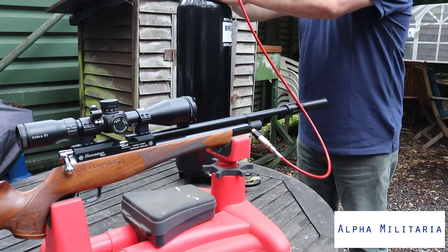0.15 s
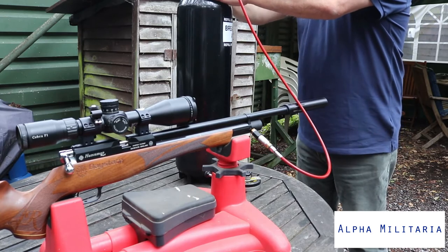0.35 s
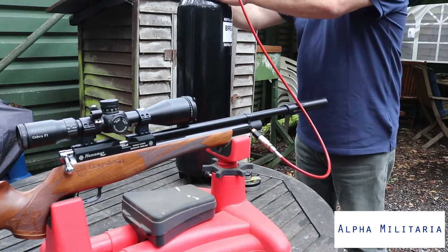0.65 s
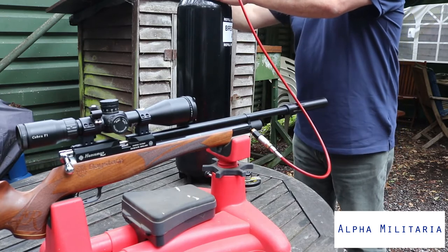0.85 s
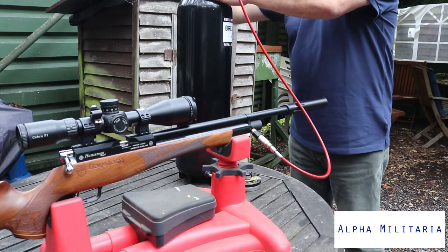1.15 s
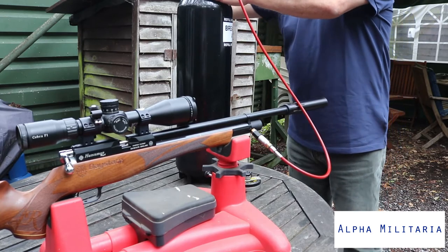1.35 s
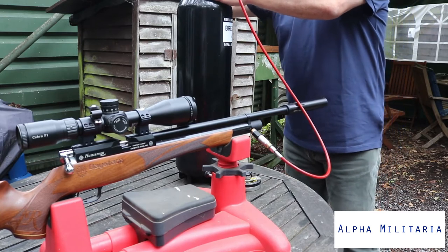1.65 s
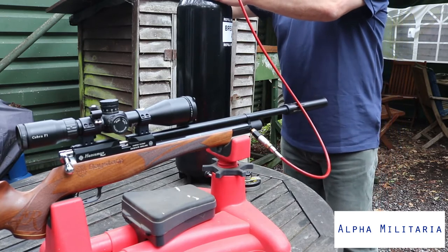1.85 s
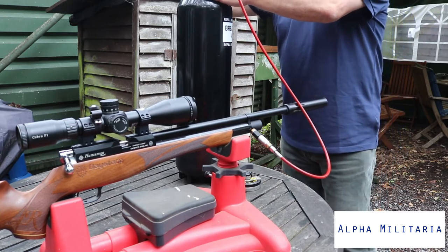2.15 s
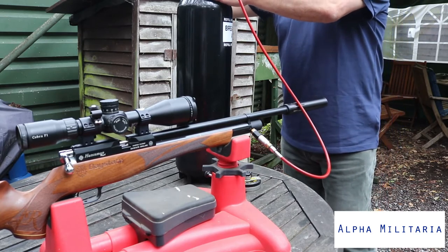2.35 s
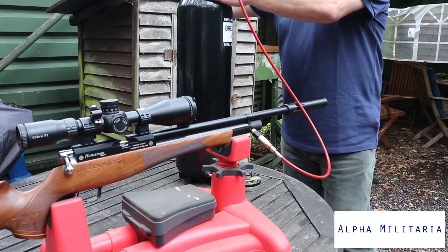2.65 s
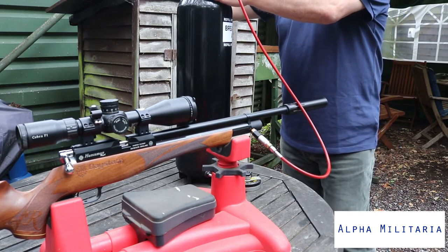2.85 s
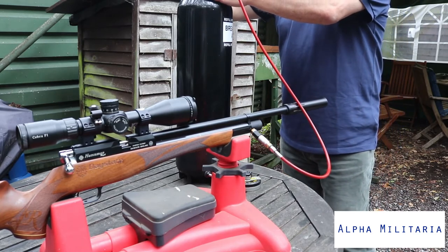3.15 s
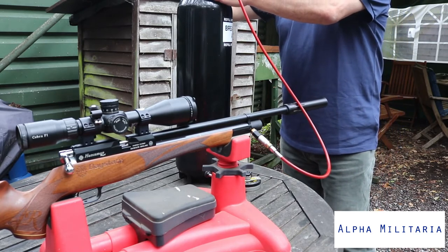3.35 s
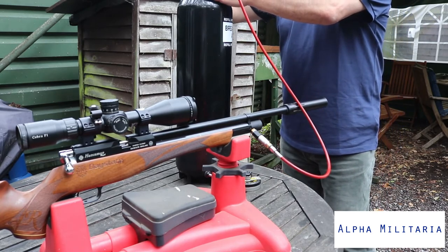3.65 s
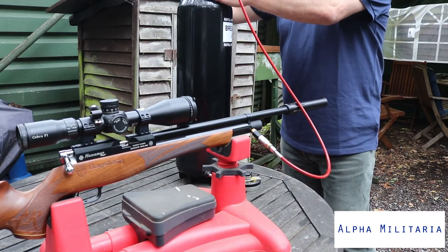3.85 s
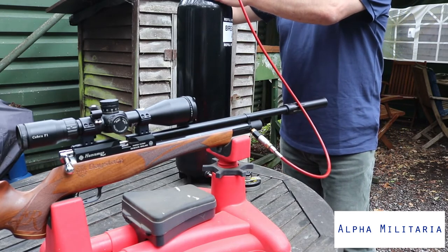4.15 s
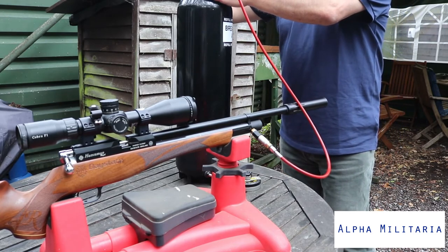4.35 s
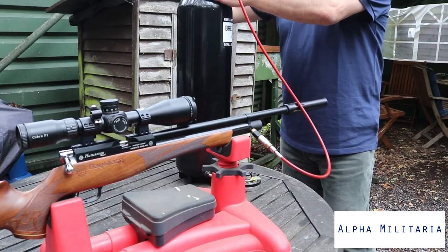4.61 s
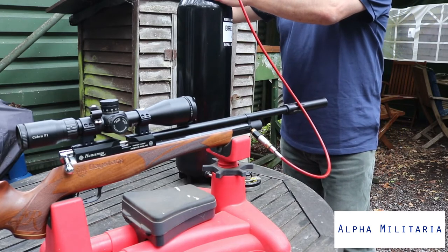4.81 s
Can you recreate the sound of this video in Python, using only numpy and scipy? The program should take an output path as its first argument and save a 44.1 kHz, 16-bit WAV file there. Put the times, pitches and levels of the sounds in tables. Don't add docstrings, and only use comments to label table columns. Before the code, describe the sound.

After a tiny leak whistle and squeak, a sharp airy jet bursts out, holds unsteadily, then dies away above low far-off rumble.

```python
import sys
import numpy as np
from scipy import signal
from scipy.fft import rfft, irfft, next_fast_len
from scipy.io import wavfile

SR = 44100
rng = np.random.default_rng(int(sys.argv[2]) if len(sys.argv) > 2 else 0)


def inscribe(sig):
    pcm = np.round(np.clip(np.atleast_2d(sig).T, -1, 1) * 32767)
    wavfile.write(sys.argv[1], SR, pcm.astype(np.int16))


def boost_factor(decibels):
    exponent = np.asarray(decibels, float) / 20
    return 10 ** exponent


N = 219461
TIME_S = np.arange(N) / SR
VALVE_OPENS_S = 0.076


def in_time(rows):
    times, *columns = np.transpose(rows)
    return [np.interp(TIME_S, times, column) for column in columns]


def at_hz(points, hz):
    table_hz, values = np.array(points)[:, 0], np.array(points)[:, 1]
    return np.interp(np.log(hz + 1), np.log(table_hz), values)


def rms_one(x):
    return x / np.sqrt(np.mean(x ** 2) + 1e-20)


def drift(rate_hz):
    pole = np.exp(-128 * np.pi * rate_hz / SR)
    noise = rng.standard_normal(N // 64 + 1002)
    slow = signal.lfilter([1], [1, -2 * pole, pole * pole], noise)[1000:]
    return np.interp(np.arange(N) / 64, np.arange(len(slow)), rms_one(slow - slow.mean()))


def bump(centre_s, length_s):
    return np.exp(-4 * np.log(2) * ((TIME_S - centre_s) / length_s) ** 2)


def bumps(rows):
    return sum(db * bump(start_s, length_s) for start_s, length_s, db in rows)


def bin_hz():
    size = next_fast_len(N // 2 + 1) * 2
    return np.arange(size // 2 + 1) * SR / size


# pitch_hz, likeness (0 to 1)
LIKENESS = [(60, 0.92), (250, 0.7), (500, 0.64), (1100, 0.32), (2000, 0.49), (4000, 0.53), (7000, 0.6)]


def stereo_noise(colour_db, hz):
    left_db, left_lead_s = 0.6, 0.000012
    mid, side = rfft(rng.standard_normal((2, 2 * len(hz) - 2)))
    alike = np.clip(at_hz(LIKENESS, hz), 0, 1)
    alike[hz > 7500] = 1
    shared, different = np.sqrt(1 + alike) * mid, np.sqrt(1 - alike) * side
    left = (shared + different) * boost_factor(left_db / 2)
    right = (shared - different) * boost_factor(-left_db / 2)
    earlier = np.exp(2j * np.pi * hz * left_lead_s * (alike < 1))
    return np.array([left * earlier, right]) * boost_factor(colour_db)


# pitch_hz, level_db (per Hz)
TRAFFIC_COLOUR = [(14, -30), (24, -12), (41, -10), (52, 1.5), (62, -1), (75, -1), (120, -2), (150, -3.5),
                  (260, -5), (360, -7.5), (620, -5.5), (960, -3), (1150, -8),
                  (1500, -14.5), (2500, -19), (5000, -30), (16000, -39)]


def traffic():
    traffic_db, rest_db, lumpy_db = -49.5, 5.5, 0.46
    idle_hz, idle_db = 52.3, -62.5
    duck_db, duck_s = -10, 0.033
    lets_go_at_s, lets_go_s = 2.304, 0.16
    hz = bin_hz()
    wash = rms_one(irfft(stereo_noise(at_hz(TRAFFIC_COLOUR, hz), hz))[:, :N])
    turned_down = np.clip((TIME_S - VALVE_OPENS_S) / duck_s, 0, 1)
    let_go = np.clip((TIME_S - lets_go_at_s) / lets_go_s, 0, 1)
    idle_phase = 2 * np.pi * np.cumsum(idle_hz + 1.5 * drift(2.5)) / SR
    rumble = wash + boost_factor(idle_db - traffic_db) * np.sin(idle_phase)
    level_db = traffic_db + duck_db * (turned_down - let_go) + rest_db + lumpy_db * drift(5.3)
    return rumble * boost_factor(level_db)


def whistle(rows, half_db, wobble_db):
    pitch_hz, level_db = in_time(rows)
    phase = 2 * np.pi * np.cumsum(pitch_hz) / SR
    sounding = (TIME_S >= rows[0][0]) & (TIME_S <= rows[-1][0])
    tone = np.sin(phase) + boost_factor(half_db) * np.sin(phase / 2)
    return sounding * boost_factor(level_db + wobble_db * drift(80)) * tone


# start_s, pitch_hz, level_db
LEAK = [
    (0, 2670, -47),
    (.013, 2690, -51),
    (.036, 2670, -48),
    (.047, 2680, -49),
    (.054, 2680, -62),
]


def leak_whistle():
    return whistle(LEAK, half_db=-40, wobble_db=1.2)


# start_s, pitch_hz, level_db
SQUEAK = [
    (.042, 1900, -60),
    (.05, 1920, -51),
    (.063, 2010, -42),
    (.073, 2040, -35),
    (.084, 2070, -29),
    (.096, 2070, -56),
]


def seat_squeak():
    return whistle(SQUEAK, half_db=-12, wobble_db=0.7)


# pitch_hz, level_db (per Hz)
JET_COLOUR = [(250, -66), (420, -27.5), (735, -27.5), (830, -24), (1230, -24), (1390, -18.5), (1940, -16.5),
              (2960, -11), (3290, -11.5), (5680, -7), (8410, -1.5), (13700, 0), (15600, -1.5)]
# pitch_hz, width_hz, level_db
HOLLOWS = [(1060, 370, 4.5), (1560, 270, 2), (2314, 360, 4), (3060, 220, 1), (4955, 110, 6),
           (6460, 230, 2.5), (7300, 250, 0), (8160, 450, 3.5), (8720, 240, 4), (9820, 560, 3)]
# pitch_hz, width_hz, level_db
NOTCHES = [(1290, 74, -3.5), (1965, 83, -2), (2760, 71, -1.5), (3410, 86, -2.5), (4370, 88, -2)]


def jet_spectra(hz):
    echo_s, echo_db = 0.00132, -20
    colour_db = at_hz(JET_COLOUR, hz)
    for pitch_hz, width_hz, db in HOLLOWS + NOTCHES:
        colour_db = colour_db + db / (1 + (2 * (hz - pitch_hz) / width_hz) ** 2)
    echo = boost_factor(echo_db) * np.exp(-2j * np.pi * hz * echo_s)
    spectra = stereo_noise(colour_db, hz) * (1 + echo)
    bright = irfft(spectra * (hz > 7000) * (hz < 11000))
    return spectra / bright.std()


# start_s, level_db (jet), rush_db (hose rush against the jet)
FLOW = [(0.09, -17.5, -12), (0.16, -20, -18.5), (0.23, -19.5, -16), (0.32, -20.5, -13), (1.01, -19, -20),
        (1.04, -19.5, -24.5), (1.9, -20.5, -21.5), (2.5, -21.5, -13.5), (2.87, -25, -19),
        (3.36, -25.5, -16.5), (3.52, -27.5, -13), (3.68, -29, -18), (3.79, -22.5, -16.5),
        (3.89, -27.5, -12), (3.93, -24, -14.5), (4.05, -22.5, -14), (4.46, -31.5, -12), (4.98, -48, -21.5)]
RUSH_FOLLOWS = [0.76, 0.56, 0.065, -0.11]
# centre_s, length_s, level_db
CATCHES = [
    (0.423, 0.056, -1.5),
    (0.948, 0.058, -3),
    (1.836, .07, -3),
    (2.36, 0.041, -1.5),
    (2.595, 0.059, -2.5),
    (3.0, .07, -2),
    (3.15, 0.1, 1.5),
    (3.552, 0.058, -2),
    (3.895, 0.023, -4.5),
]
# centre_s, length_s, level_db (moved from core to edge)
SWAYS = [(.41, .05, 2.5), (0.943, 0.046, 2), (1.16, 0.08, 3.5), (1.35, 0.12, -5.5), (1.646, 0.06, -7),
         (1.743, 0.15, 3), (1.9, 0.034, -1.5), (2.147, 0.33, 4.5), (2.48, 0.064, 0.5), (2.93, 0.14, 3.5),
         (3.33, 0.17, -5.5), (3.56, 0.055, 6), (4.45, 0.27, -1.5)]


def zone_levels_db():
    core_db = -3
    sway_follows = [-0.059, 0.3, -0.66, 0.56]
    flow_db, rush_db = in_time(FLOW)
    flow_db = flow_db + core_db + bumps(CATCHES)
    rush_db = rush_db - rush_db[SR // 5:SR * 23 // 10].mean()
    return flow_db + np.outer(RUSH_FOLLOWS, rush_db) + np.outer(sway_follows, bumps(SWAYS))


ZONES_HZ = [2400, 5200, 8800, 13200]
# centre_s, length_s, level_db, pitch_hz
EDDIES = [(0.08, .02, 8, 1500), (0.164, 0.16, 5, 4400), (2.65, .2, 2, 14300), (3.87, 0.055, -1, 15000),
          (3.803, .07, 3.5, 3000), (.12, 0.083, -1, 6300), (.34, .1, -2.5, 2110), (3.93, 0.035, 5, 2200),
          (4.252, 0.28, 5.5, 1830), (0.226, 0.092, 10.5, 3160), (0.592, .12, 5, 1290),
          (1.165, 0.042, -6, 2000), (2.25, 0.059, 2, 4500), (2.532, 0.22, 6, 1490), (3.18, 0.1, 3, 4600),
          (3.803, 0.055, 5.5, 4970), (4.0, 0.11, 5, 2240), (4.3, 0.41, -4.5, 3400)]


def jet():
    shared_db, patch_db, eddy_db = 0.41, 1.1, 0.28
    eddy_octaves = 0.41
    rise_s, burst_db, burst_s = 0.007, 1.5, 0.02
    hz = bin_hz()
    spectra = jet_spectra(hz)
    zones_db = zone_levels_db()
    spills_db = np.array([db * bump(start_s, length_s) for start_s, length_s, db, _ in EDDIES])
    eddy_hz = np.array(EDDIES)[:, -1]
    centres = np.concatenate([np.geomspace(500, 4000, 8), np.arange(4900, 16200, 900)])
    gust, eddies = drift(14), drift(300)
    out = 0
    for k, centre in enumerate(centres):
        share = np.interp(hz, centres, np.arange(len(centres)) == k)
        weights = [np.interp(np.log(centre), np.log(ZONES_HZ), row) for row in np.eye(4)]
        reach = np.exp(-(np.log2(centre / eddy_hz) / eddy_octaves) ** 2)
        patch = drift(3) + 0.7 * drift(12)
        flicker_db = shared_db * gust + eddy_db * eddies + patch_db * patch
        level_db = weights @ zones_db + reach @ spills_db + flicker_db
        out = out + irfft(spectra * share)[:, :N] * boost_factor(level_db)
    since_s = TIME_S - VALVE_OPENS_S
    opening = np.clip(since_s / rise_s, 0, 1) ** 2
    burst = boost_factor(burst_db * np.exp(-np.maximum(since_s, 0) / burst_s))
    return out * opening * burst


def scene():
    return traffic() + leak_whistle() + seat_squeak() + jet()


# pitch_hz, level_db (left minus right)
TREBLE_PAN = [(7875, .9), (8625, .3), (10125, .2), (10875, -1.6), (11625, -3), (12375, -5.2), (13125, -7.1),
              (14625, -7.5), (15375, -8.9)]
# pitch_hz (band centre), chance (0 to 1)
REVERSAL_CHANCE = [(7875, .17), (8625, .045), (9375, .045), (10125, .14), (10875, .006), (15375, .004)]


def joint_treble(x):
    wander_db, dead_db, step_db = 1.3, 2.0, 1.5
    thin_from_s, thin_share, reversals_end_s = 2.8, 0.3, 4.3
    hop, start = 941, 350 - 2 * 941
    first, width, top = 320, 32, 672
    window = signal.windows.kaiser_bessel_derived(2 * hop, 4 * np.pi)
    padded = np.pad(x, ((0, 0), (-start, 3 * hop)))
    count = padded.shape[1] // hop - 1
    at = np.arange(count)[:, None] * hop + np.arange(2 * hop)
    left, right = rfft(padded[:, at] * window)
    bands = np.arange((hop + 1 - first) // width + 1)
    band_hz = (first + width * (bands + 0.5)) * SR / 2 / hop

    luck = rng.standard_normal((count, len(bands)))
    luck = (luck + np.roll(luck, 1, axis=0) + np.roll(luck, 1, axis=1)) / np.sqrt(3)
    pan_db = at_hz(TREBLE_PAN, band_hz) + wander_db * luck
    pan_db = step_db * np.round(pan_db / step_db) * (abs(pan_db) > dead_db)

    frame_s = (start + hop * np.arange(1, count + 1)[:, None]) / SR
    active = (frame_s > VALVE_OPENS_S) * (frame_s < reversals_end_s)
    chance = at_hz(REVERSAL_CHANCE, band_hz) * np.where(frame_s < thin_from_s, 1, thin_share) * active
    sign = np.where(rng.random(pan_db.shape) < chance, -1, 1)

    band_of = (np.arange(first, hop + 1) - first) // width
    ratio = boost_factor(-pan_db)[:, band_of]
    single = left[:, first:] * 2 / (1 + ratio)
    left[:, first:] = single
    right[:, first:] = single * ratio * sign[:, band_of]
    left[:, top:] = right[:, top:] = 0

    out = np.zeros_like(padded)
    frames = irfft(np.array([left, right])) * window
    out[:, :count * hop] += frames[:, :, :hop].reshape(2, -1)
    out[:, hop:(count + 1) * hop] += frames[:, :, hop:].reshape(2, -1)
    return out[:, -start:N - start]


def roll_off(x):
    return signal.sosfilt(signal.butter(12, 16980, fs=SR, output="sos"), x)


def record(dry):
    mix = joint_treble(dry)
    return roll_off(mix)


dry = scene()
out = record(dry)
inscribe(out)
```